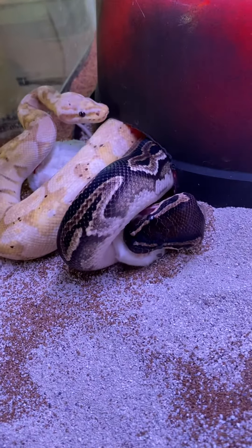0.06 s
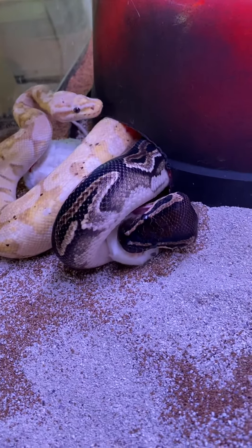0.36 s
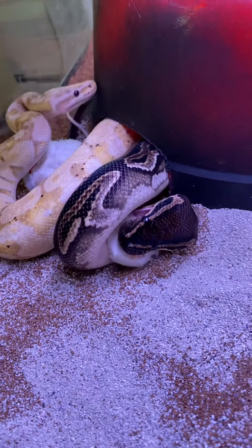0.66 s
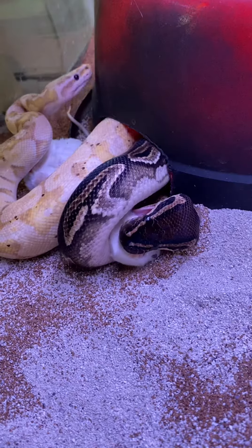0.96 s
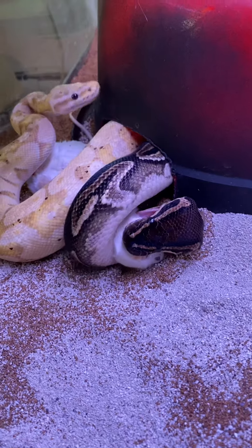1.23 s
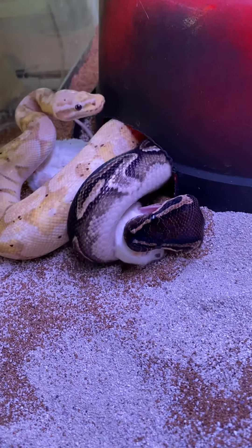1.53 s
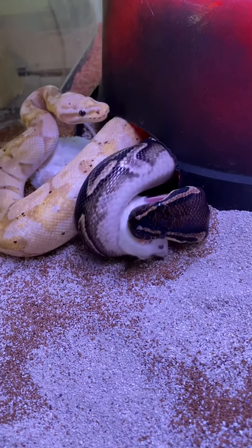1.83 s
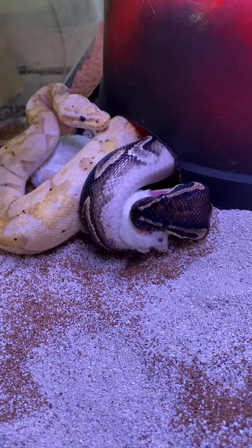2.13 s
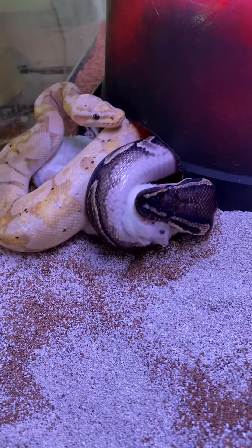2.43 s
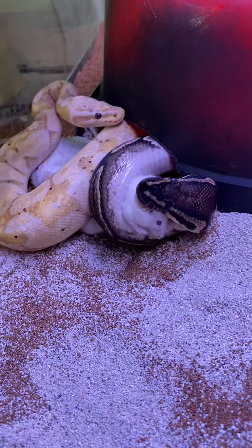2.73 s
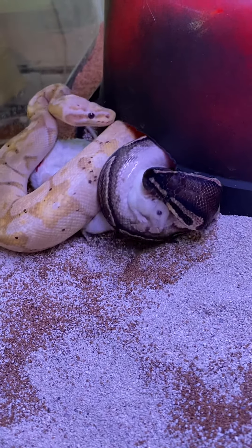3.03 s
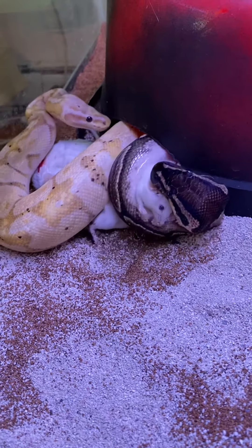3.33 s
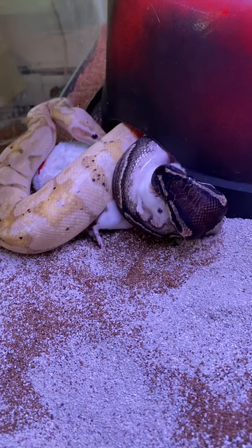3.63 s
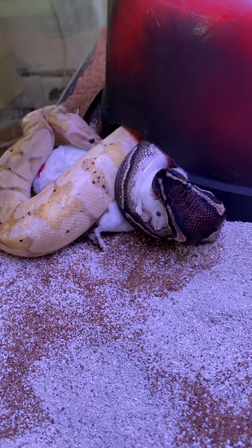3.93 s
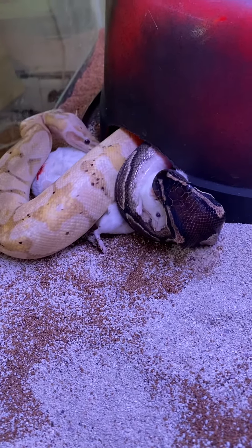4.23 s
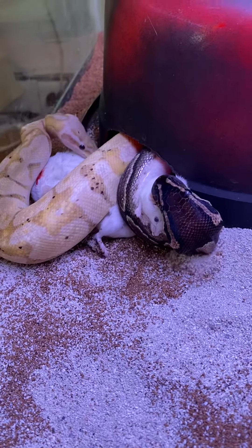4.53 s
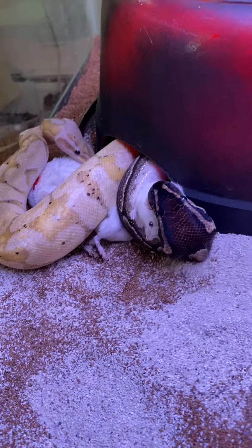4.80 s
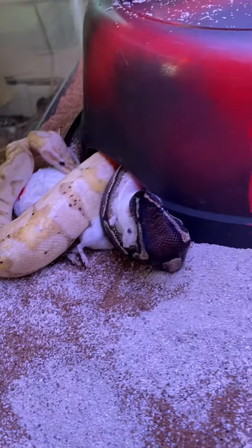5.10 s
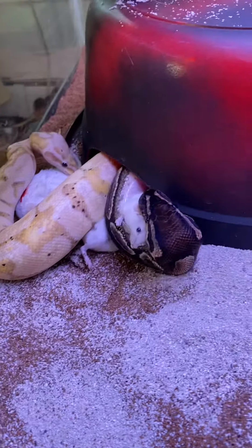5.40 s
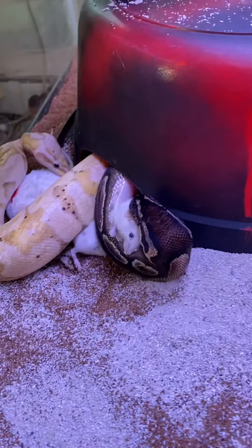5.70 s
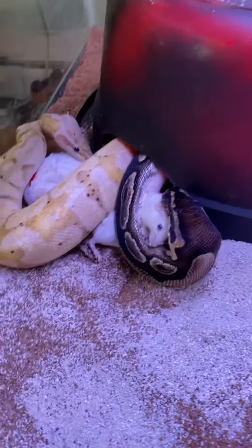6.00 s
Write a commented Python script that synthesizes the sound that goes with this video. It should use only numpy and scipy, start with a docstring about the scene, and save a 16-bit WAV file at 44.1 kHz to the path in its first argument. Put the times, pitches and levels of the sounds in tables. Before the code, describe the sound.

Snakes faintly rub and crunch over coarse sand in a glass tank, with small hollow knocks above a low fan drone and lamp buzz.

```python
"""Snakes coiling on sand

Two snakes tighten their coils beside a plastic hide in a glass terrarium. Their scales rub and push
coarse sand, which hisses, crunches and ticks and sets the hollow hide ringing. Near the end cloth
brushes twice close by, the tank is bumped and a deep boom swells briefly. A fan drones and a lamp
buzzes at mains rate throughout; a distant engine throbs, mostly at first."""
import sys
import numpy as np
from scipy import signal
from scipy.fft import rfft, irfft
from scipy.io import wavfile

SR = 44100
rng = np.random.default_rng(int(sys.argv[2]) if len(sys.argv) > 2 else 0)


def pcm_store(signal):
    """Save signal as 16-bit PCM."""
    levels = np.round(np.clip(np.atleast_2d(signal), -1, 1) * 32767)
    wavfile.write(sys.argv[1], SR, levels.astype(np.int16).T)


N = 271215
T = np.arange(N) / SR
HZ = np.fft.rfftfreq(N, 1 / SR)
MAINS_HZ = 59.993

# bright spectrum of sand grains colliding: f/Hz, level/dB
GRIT = [(300, -11.5), (900, -9), (2000, 4.5), (3000, 5.5), (4500, 6), (6000, 9.5), (7500, 0), (9500, 7),
        (11000, 3.5), (14000, 1.5), (16000, 2)]


def amp(db):
    """Decibels to gain."""
    return 10 ** (np.asarray(db) / 20)


def unit_rms(x):
    """Scales to an rms of one."""
    return x / np.sqrt(np.mean(x ** 2) + 1e-20)


def follow(rows):
    """Turns breakpoints into one curve for each column after the time."""
    times, *columns = np.transpose(rows)
    return [np.interp(T, times, column) for column in columns]


def colour(x, spectrum):
    """Equalises by a spectrum curve, to an rms of one."""
    hz, db = np.transpose(spectrum)
    gain = amp(np.interp(np.log(HZ + 1), np.log(hz), db))
    return unit_rms(irfft(rfft(x) * gain, N))


def low_cut(x, hz, order=3):
    """Rolls off everything below hz."""
    return signal.sosfilt(signal.butter(order, hz, "high", fs=SR, output="sos"), x)


def resonate(x, hz, width_hz):
    """A steep resonance that can follow a pitch curve, at an rms of one."""
    carrier = np.exp(2j * np.pi * np.cumsum(hz * np.ones(N)) / SR)
    pole = np.exp(-np.pi * width_hz / SR)
    return unit_rms((carrier * signal.lfilter([1], [1, -2 * pole, pole * pole], x / carrier)).real)


def drift(rate_hz):
    """Smooth random modulation with an rms of one."""
    return unit_rms(irfft(rfft(rng.standard_normal(N)) * np.exp(-(HZ / rate_hz) ** 2), N))


def grains(per_s, spread_db):
    """Random clicks, most small and a few larger."""
    size = amp(spread_db * np.minimum(rng.exponential(1, N), 4))
    return size * rng.choice([-1, 1], N) * (rng.random(N) < per_s / SR)


def stroke(start, length, attack_s, release_s):
    """Attack, hold and release of one movement."""
    rise = np.clip((T - start) / attack_s + .5, 0, 1)
    fall = np.clip((start + length - T) / release_s + .5, 0, 1)
    return rise * fall


def add(mix, s, sound):
    """Mixes a sound in at s seconds."""
    part = mix[round(s * SR):][:len(sound)]
    part += sound[:len(part)]


def room_tone(level_db=-71.0, shared=0.071):
    """Steady noise from all sides, a small share of it common to left and right."""
    # room noise spectrum: f/Hz, level/dB
    spectrum = [(100, -3), (240, 6.5), (330, 3), (480, -4.5), (900, -4.5), (1800, -21.5), (3300, -4.5),
                (4700, -24), (6200, -16), (7300, -50), (8700, -21.5), (10500, -29.5), (16000, -38)]
    common, left, right = (colour(rng.standard_normal(N), spectrum) for _ in range(3))
    return amp(level_db) * (np.sqrt(shared) * common + np.sqrt(1 - shared) * np.array([left, right]))


def engine(rough=0.55, sharpness=2.3):
    """A far engine throbs through the walls, each beat a thump and a puff of noise."""
    # the engine slowing and fading unevenly: t/s, beat rate/Hz, level/dB
    run = [(0, 42, -71), (0.35, 41, -51), (0.55, 40, -51.5), (0.8, 39, -60.5), (1.3, 37.5, -56),
           (1.76, 36, -56), (1.95, 35.5, -80), (2.7, 34, -62), (3.5, 36, -75)]
    # its beats, muffled by the walls: f/Hz, level/dB
    muffled = [(27, -24.5), (38, 3.5), (60, -11), (100, -10.5), (135, 4), (165, -4.5), (205, 3.5),
               (250, -9), (310, -35), (600, -71)]
    rate, db = follow(run)
    beats = np.exp(sharpness * np.cos(2 * np.pi * np.cumsum(rate) / SR))
    thumps = colour(beats - beats.mean(), muffled)
    puffs = colour(beats * rng.standard_normal(N), muffled)
    return unit_rms((1 - rough) * thumps + rough * puffs) * amp(db)


def boom(peak_s=6, swell_s=0.03, hz=55, level_db=-50):
    """A deep tone swells and is gone at once."""
    swell = np.exp(-((T - peak_s) / swell_s) ** 2)
    return np.sqrt(2) * np.sin(2 * np.pi * hz * T) * swell * amp(level_db)


def fan(hz=106.36, waver_db=1.92, ease_s=2.35):
    """A wavering low drone in a rumble of moving air that starts stronger and eases off."""
    # drone envelope: t/s, level/dB
    envelope = [(0, -46), (1.1, -48), (1.9, -52), (3.05, -49.5), (3.3, -53.5), (3.8, -53.5), (4.1, -49),
                (4.8, -46.5), (5.3, -52), (6.15, -61)]
    # air rumble spectrum: f/Hz, level/dB
    rumble = [(20, -34.5), (38, -6), (60, -0.5), (85, -1.5), (120, 2.5), (165, -11.5), (215, -8.5),
              (260, -15), (310, -33.5), (600, -58), (2000, -104)]
    drone_db = follow(envelope)[0] - 0.5 + waver_db * drift(rate_hz=30.5)
    drone = np.sqrt(2) * np.sin(2 * np.pi * hz * T) * amp(drone_db)
    rumble_db = -55 + 4 * np.exp(-(T / ease_s) ** 2)
    return drone + colour(rng.standard_normal(N), rumble) * amp(rumble_db)


def lamp_buzz(tick_s=.01044, times_s=(.6, 3.2, 5.7)):
    """One tick every mains cycle rings the lamp housing; the buzz slowly shifts in colour."""
    # buzz partials: mains harmonic, level/dB at each of the three times_s, left minus right/dB
    partials = [(6, -84, -82, -83, -1), (44, -98, -90, -91, -2), (46, -90, -91, -101, -2),
                (48, -91, -90, -98, 2), (50, -90, -91, -89, 8), (51, -93, -89, -94, 5),
                (52, -89, -91, -92, 4), (53, -78.5, -78, -81, 3), (54, -67.5, -67.5, -72, 7),
                (55, -79, -71, -71, 5), (56, -78.5, -78.5, -84, 7), (57, -79, -77, -77.5, 0),
                (58, -79.5, -78, -79, -1), (59, -76.5, -76, -75, -2), (60, -87, -83, -84, -2),
                (61, -81, -80, -81.5, -2), (63, -99, -94, -99, 5), (64, -92, -91, -92, 3),
                (66, -89.5, -88.5, -95, 2), (68, -88, -88, -94, -1), (70, -93, -91, -102, -10),
                (72, -92, -93, -98, 4), (80, -97, -99, -103, 0), (84, -101, -95, -94, 1),
                (86, -95, -86, -86.5, 3), (88, -104, -97, -95, 0), (92, -102, -95, -102, 1),
                (96, -101, -101, -104, 0), (104, -98, -96, -101, -1)]
    # housing modes, each delaying the harmonics near it: f/Hz, width/Hz
    housing = [(3259, 25), (3404, 15), (3467, 15), (3551, 38), (4047, 15)]
    out = np.zeros((2, N))
    for harmonic, *levels_db, pan_db in partials:
        hz = harmonic * MAINS_HZ
        lag = sum(np.arctan2(2 * (hz - mode_hz), width) for mode_hz, width in housing)
        tone = np.sqrt(2) * np.cos(2 * np.pi * hz * (T - tick_s) - lag)
        pan = amp(np.array([[.5], [-.5]]) * pan_db)
        out += pan * tone * amp(np.interp(T, times_s, levels_db))
    return out


def lamp_fizz(harmonic_db=-103.0, scatter_db=3.0):
    """The lamp's faint, uneven upper harmonics, and a rough sizzle twice a mains cycle."""
    # sizzle envelope: t/s, level/dB
    envelope = [(0, -98), (1.1, -89), (3, -96), (6.15, -94)]
    whine = np.zeros(N)
    for harmonic in range(62, 106):
        gain = amp(harmonic_db + scatter_db * rng.standard_normal())
        whine += gain * np.cos(2 * np.pi * (harmonic * MAINS_HZ * T + rng.random()))
    sparks = rng.standard_normal(N) * abs(np.sin(2 * np.pi * MAINS_HZ * T))
    return whine + resonate(sparks, hz=5190, width_hz=220) * amp(follow(envelope)[0])


def sleeve(gain_db=2.0, steepness=1.4, catch_db=-0.2):
    """Two strokes of cloth swell and fade: fine fibre noise that catches unevenly."""
    # brush strokes: peak t/s, level/dB, rise/s, fall/s, low cut/Hz
    brushes = [(5.007, -62, 0.097, 0.072, 400), (5.232, -63, 0.047, 0.042, 785)]
    # cloth spectrum: f/Hz, level/dB
    cloth = [(300, 0), (650, -2.5), (930, 2.5), (1250, 0.5), (1700, -5), (2200, -0.5), (2700, -0.5),
             (3600, -5), (4600, -1.5), (5800, -10), (7000, -17.5), (10000, -18.5), (16000, -23)]
    out = np.zeros(N)
    for s, db, rise_s, fall_s, low_hz in brushes:
        swell = amp(db) * np.exp(-(abs(T - s) / np.where(T < s, rise_s, fall_s)) ** steepness)
        fibres = colour(grains(per_s=3900, spread_db=1.0), cloth) * amp(catch_db * drift(rate_hz=88))
        out += low_cut(fibres, low_hz) * swell
    return out * amp(gain_db)


def bump(s=5.8207, gain_db=-43, rise_cycles=0.45, tail_t60=0.16):
    """A dull knock: the tank floor thuds, the sand jumps and the room rings briefly."""
    # tank modes: f/Hz, level/dB, t60/s, delay/s
    modes = [(197, 3, 0.11, .007), (232, 4, 0.028, .007), (700, 5, 0.032, 0.00065), (625, -5, 0.05, 0.0025),
             (846, -13, 0.1, 0.0029), (1520, -3, 0.022, 0), (2250, -9.5, 0.02, 0)]
    out, t = np.zeros(N), T[:SR // 5]
    for hz, db, t60, delay_s in modes:
        envelope = amp(db - 60 * t / t60) * (1 - np.exp(-t * hz / rise_cycles))
        add(out, s + delay_s, envelope * np.sin(2 * np.pi * hz * t))
    mids = signal.butter(2, [560, 1200], "band", fs=SR, output="sos")
    room = amp(-17) * unit_rms(signal.sosfilt(mids, rng.standard_normal(len(t))))
    sand = amp(-28.5) * colour(rng.standard_normal(N), GRIT)[:len(t)]
    add(out, s, (room + sand) * amp(-60 * t / tail_t60))
    return amp(gain_db) * out


def hide_knock(detune, low_hz, top_hz, click_db, size=4096):
    """A blow clicks and rings the hide; a light one lacks the lows, a soft one the highs."""
    # resonances of the hide and the floor beneath: f/Hz, width/Hz, level/dB
    modes = [(615, 80, 1.5), (702, 80, 0), (810, 150, -8), (1180, 85, -8), (1289, 93, -4.5),
             (1616, 120, -11.5), (1910, 62, -15), (2146, 150, -10), (2330, 94, -10), (2593, 80, -6)]
    load_shift = 1 + detune * rng.standard_normal()  # the resonances move with the load
    f = abs(np.fft.fftfreq(size, 1 / SR)) * load_shift + 1
    peaks = sum(amp(db) ** 2 / (1 + ((f - hz) / (0.48 * width)) ** 2) ** 2 for hz, width, db in modes)
    power = (amp(click_db) ** 2 + peaks) / (1 + (f / top_hz) ** 6) / (1 + (low_hz / f) ** 6)
    log_gain = .5 * np.log(power + 1e-8)
    blow = np.fft.ifft(np.exp(np.conj(signal.hilbert(log_gain)))).real  # rings only after the blow
    return blow / abs(blow).max()


def coil_forces(creep_db=-85, rest_s=4.4, rest_db=-14):
    """Envelopes of skin rub, floor load and pushed sand: a creep that settles, with shifts on top."""
    # coil shifts: t/s, length/s, effort/dB, floor load/dB and pushed sand/dB relative to the effort
    shifts = [(0.25, 0.57, -75, -7, -29), (0.824, 0.13, -76.5, 0, -11), (0.988, 0.18, -76.5, 3.5, -5.5),
              (1.2, 0.22, -78.5, -2, -3), (1.412, 0.23, -72.5, 4.5, -4.5), (1.60, 0.06, -78, 5, -4),
              (1.727, 0.13, -71, 5.5, -3.5), (1.843, 0.3, -81, 5, -5.5), (2.163, 0.24, -73.5, 6, -7),
              (2.42, 0.15, -68.5, 1.5, -7.5), (2.556, 0.58, -69, 3.5, -6.5), (2.663, 0.3, -77, 8, -8),
              (2.902, 0.089, -72, 9, 1.5), (3.15, 0.26, -76, 6.5, -12), (3.444, 0.33, -78, 2, -29),
              (3.78, 0.085, -74.5, -4, 0), (3.846, 0.15, -72.5, 2.5, -18), (4.158, 0.092, -75.5, 4, -18),
              (4.408, 0.16, -73.5, 0, -14), (4.727, 0.069, -73, -8, -10), (5.625, 0.28, -81.5, -0.5, -10),
              (6.056, 0.14, -80.5, -10, -9)]
    creep = amp(creep_db + rest_db * np.clip(T - rest_s, 0, 1))
    power = np.outer(amp([0, 4.5, -11.5]), creep) ** 2
    for start, length, effort_db, weight_db, sand_db in shifts:
        effort = amp(effort_db) * stroke(start, length, attack_s=0.032, release_s=0.087)
        power += np.outer(amp([0, weight_db, sand_db]), effort) ** 2
    return np.sqrt(power)


def sparkle(gain_db=-7.0):
    """Hard grains flick against each other wherever loose sand is pushed."""
    flicks = low_cut(grains(per_s=110, spread_db=3.0), hz=9000)
    _, _, sand = coil_forces()
    return unit_rms(flicks) * sand * amp(gain_db)


def ticks(gain_db=16.5, t60=0.0026):
    """Single grains crack free, each with a tiny, very bright click."""
    # grain cracks: t/s, level/dB
    cracks = [(1.2205, -76), (1.283, -70), (1.34, -72), (1.4405, -73), (1.491, -77), (1.543, -68),
              (1.737, -77), (1.775, -69), (1.943, -74), (2.3315, -74), (2.7432, -65), (2.803, -72),
              (3.109, -69), (3.8, -71), (5.7075, -78)]
    out, t = np.zeros(N), T[:SR // 50]
    for s, db in cracks:
        click = low_cut(rng.standard_normal(len(t)) * amp(-60 * t / t60), hz=7000, order=2)
        add(out, s, amp(db + gain_db) * click / abs(click).max())
    return out


def scraping():
    """Scales drag on the hide: a faint, rough squeak wanders, and each scuff rings one resonance."""
    # squeak contour: t/s, f/Hz, level/dB
    squeak = [(1.42, 2170, -90), (1.46, 2150, -79), (1.51, 2170, -76), (1.53, 2200, -83),
              (1.558, 2270, -74), (1.595, 2170, -80), (1.63, 2260, -75), (1.675, 2140, -74),
              (1.70, 2130, -100)]
    # scuffs on the hide or floor: t/s, length/s, level/dB, f/Hz, width/Hz
    scuffs = [(0.835, 0.09, -74.5, 497, 262), (0.876, 0.033, -77, 890, 300), (1.445, .05, -72, 1260, 160),
              (1.533, .05, -83, 1290, 160), (1.618, 0.034, -67.5, 1268, 160), (1.71, 0.043, -68, 1240, 160),
              (1.784, 0.046, -78, 1268, 160), (3.875, 0.015, -60.5, 680, 130),
              (4.633, 0.038, -70.5, 390, 130)]
    squeak_hz, squeak_db = follow(squeak)
    gate = (T > squeak[0][0]) * (T < squeak[-1][0])
    out = resonate(grains(per_s=500, spread_db=1.0), squeak_hz, width_hz=190) * amp(squeak_db) * gate
    for start, length, db, hz, width_hz in scuffs:
        drag = amp(db) * stroke(start, length, attack_s=0.019, release_s=0.015)
        out += resonate(grains(per_s=1400, spread_db=1.0), hz, width_hz) * drag
    return out


def slips(snap_t60=0.031, tumble_s=0.005):
    """Clumps give way under a coil: a bright snap, a dry knock in the hide, three grains tumbling."""
    # collapsing clumps: t/s, knock level/dB, snap level/dB, knock low cut/Hz, knock high cut/Hz
    clumps = [(1.423, -57, -72, 500, 1100), (1.442, -42, -62, 680, 1700), (1.453, -55, -74, 500, 1400),
              (1.477, -48, -66, 550, 2000), (1.53, -61, -74, 900, 1500), (1.549, -54, -64, 450, 1100),
              (1.621, -55, -74, 500, 1400), (1.667, -44.5, -73, 700, 1450), (1.713, -50, -68, 550, 1400),
              (1.722, -51, -72, 550, 1400), (1.738, -52, -69, 800, 1800), (1.749, -42, -57, 550, 3560),
              (1.785, -55, -60, 1500, 4000), (1.801, -55, -70, 450, 900), (1.944, -53.5, -60, 550, 3000),
              (2.18, -54, -74, 600, 3000), (2.224, -55.5, -76, 450, 895), (2.244, -54, -72, 450, 990),
              (2.258, -57, -68, 900, 2500), (2.294, -56, -76, 450, 1200), (2.332, -54.5, -65, 600, 2000),
              (2.366, -52, -69, 546, 2200), (2.4389, -39, -54, 600, 6000), (2.4412, -38.5, -58, 600, 1350),
              (2.467, -49, -70, 800, 2000), (2.512, -58, -68, 700, 2000), (2.563, -50, -59, 800, 3000),
              (2.632, -55, -70, 500, 1500), (2.688, -49.5, -70, 700, 3000), (2.776, -60, -73, 900, 2000),
              (2.804, -55, -66, 500, 2500), (2.85, -48.5, -61, 500, 2000), (2.884, -54, -68, 500, 2000),
              (2.93, -48, -64, 550, 3000), (2.976, -54, -73, 450, 1300), (3.039, -52, -64, 800, 2500),
              (3.109, -52.5, -64, 895, 3500), (3.907, -58, -78, 593, 1500), (3.929, -47, -74, 845, 2260),
              (4.182, -57.5, -75, 900, 2000), (4.437, -55, -74, 1200, 5000), (4.457, -56, -71, 600, 2000),
              (4.528, -58, -76, 1600, 5000), (4.731, -55.5, -73, 600, 5000), (5.387, -64, -80, 1700, 3000)]
    out, t = np.zeros(N), T[:SR // 8]
    grit = colour(rng.standard_normal(N), GRIT)
    for s, knock_db, snap_db, low_hz, top_hz in clumps:
        knock = hide_knock(detune=0.015, low_hz=low_hz, top_hz=top_hz, click_db=-16)
        add(out, s, amp(knock_db - 1.5) * knock)
        for delay_s in tumble_s * rng.uniform(.25, 1, size=3):
            tumble = hide_knock(detune=0.032, low_hz=1.47 * low_hz, top_hz=top_hz, click_db=-20.5)
            add(out, s + delay_s, rng.choice([-1, 1]) * amp(knock_db - 9) * tumble)
        snap = grit[round(s * SR):][:len(t)] * amp(-60 * t / snap_t60)
        add(out, s, amp(snap_db - 3.5) * snap)
    return out


def sliding(smooth_db=-71, clump_db=1.77, lurch_db=1.0):
    """Scales rub and push sand in clumps: it hisses, crunches, rings the floor and makes it shudder."""
    # scales rubbing on scales: f/Hz, level/dB
    scales = [(250, 0), (400, 9), (510, 1.5), (620, -0.5), (850, 5.5), (1000, 1), (1300, 3.5), (1500, -1),
              (1800, -5.5), (2500, -1), (4200, -5), (6000, -17.5), (10000, -29), (16000, -27)]
    # coarse grains crunching: f/Hz, level/dB
    coarse_sand = [(500, -29), (1000, -6.5), (1250, -1), (1450, -7), (1630, 1), (1780, -7), (2150, 3.5),
                   (2380, 3.5), (2480, -1.5), (2610, 2.5), (2800, -12), (4400, -6.5), (5500, -18),
                   (7000, -21.5), (16000, -29)]
    # the tank floor shuddering under a push: f/Hz, level/dB
    tank_floor = [(100, -24.5), (170, -6.5), (215, -1.5), (270, -11), (340, -30.5), (700, -64)]
    forces = coil_forces()
    catching = np.minimum(forces[0] / amp(smooth_db), 1)  # gentler shifts slide more evenly
    judder_db = clump_db * drift(rate_hz=55) + lurch_db * drift(rate_hz=19)
    skin, weight, sand = forces * amp(catching * judder_db)
    hiss = colour(grains(per_s=3000, spread_db=1.2), GRIT) * sand * amp(2)
    rub = colour(grains(per_s=7000, spread_db=0.5), scales) * skin * amp(-1.5)
    pushes = unit_rms(grains(per_s=850, spread_db=2.0))
    crunch = colour(pushes, coarse_sand) * skin * amp(-5)
    body = hide_knock(detune=0, low_hz=406, top_hz=2340, click_db=-24.5)
    grind = signal.oaconvolve(pushes * weight * amp(-2.5), body / np.linalg.norm(body))[:N]
    shudder = colour(pushes, tank_floor) * weight
    return hiss + rub + crunch + grind + shudder


def glass_reflections(x, t60=0.2, wet_db=-11):
    """Quick reflections cross between the side walls and arrive left and right with opposite sign."""
    t = T[:SR // 5]
    taps = rng.standard_normal(len(t)) * (rng.random(len(t)) < .1)
    taps *= amp(-60 * t / t60) * (t > .001)
    wet = low_cut(signal.oaconvolve(x, taps / np.linalg.norm(taps))[:N], hz=330)
    return x + amp(wet_db) * np.array([wet, -wet])


def scene():
    """The snakes and the sounds around them reflect in the tank, over the lamp and the room tone."""
    snakes = sliding() + sparkle() + scraping() + slips() + ticks()
    surroundings = bump() + sleeve() + fan() + engine() + boom()
    return glass_reflections(snakes + surroundings) + lamp_buzz() + lamp_fizz() + room_tone()


def record(dry, edge_hz=15850):
    """Turns the treble out of phase between the channels, leaves the bass, and cuts the very top."""
    # phase between left and right: f/Hz, phase/rad
    stereo_phase = [(0, 0), (1500, -0.3), (2300, 0.5), (3200, 0.3), (4000, 0.9), (4900, 0.2), (6000, 1.4),
                    (7000, 3.1), (7700, 3.2), (9800, 6.2), (11500, 6.4), (12500, 9.3), (14200, 9.5),
                    (15600, 12.1)]
    phase = np.interp(HZ, *np.transpose(stereo_phase)) * np.clip(HZ / 300 - 1, 0, 1)
    wide = irfft(rfft(dry) * np.exp(1j * phase * np.array([[.5], [-.5]])), N)
    high_cut = signal.firwin(511, edge_hz, window=("kaiser", 9), fs=SR)
    return signal.oaconvolve(wide, high_cut[None], "same")


dry = scene()
out = record(dry)
pcm_store(out)
```